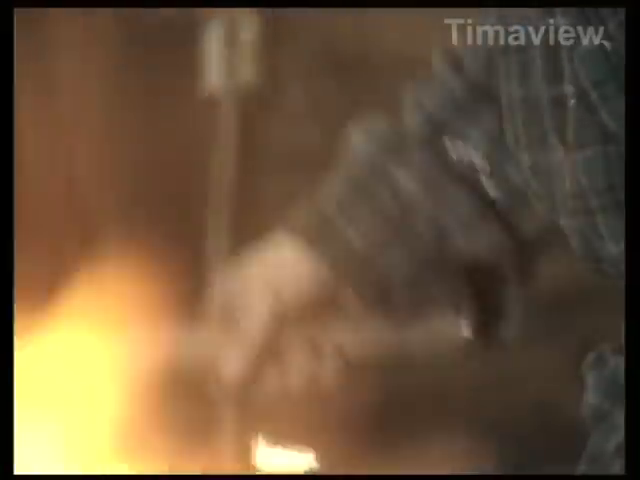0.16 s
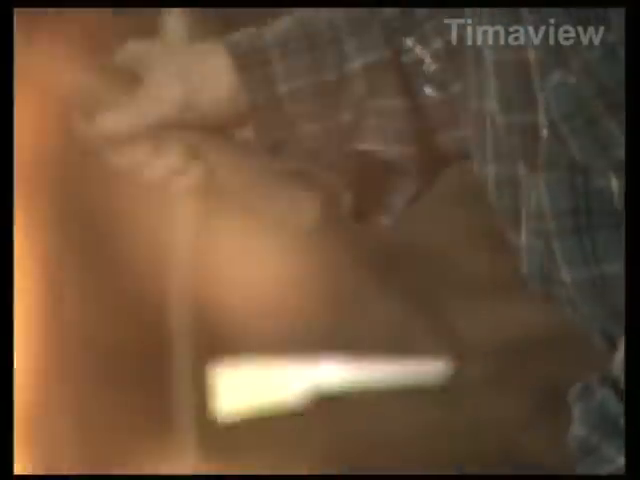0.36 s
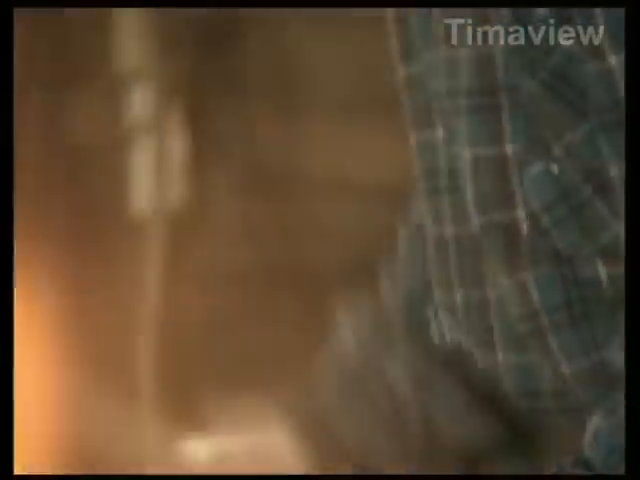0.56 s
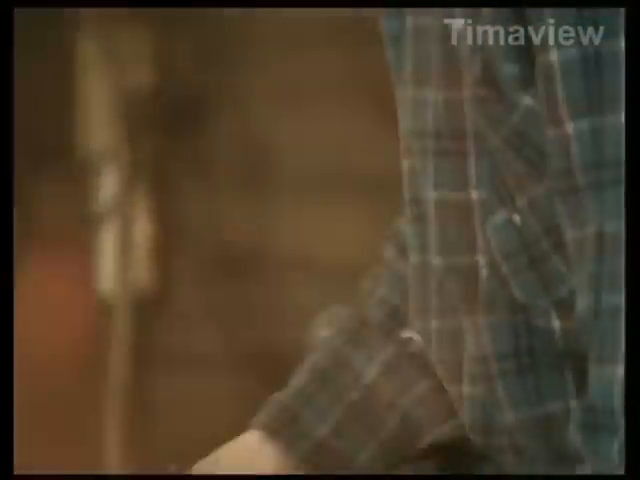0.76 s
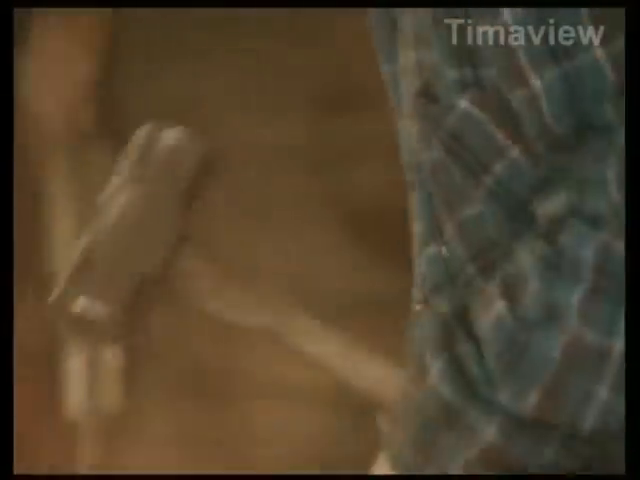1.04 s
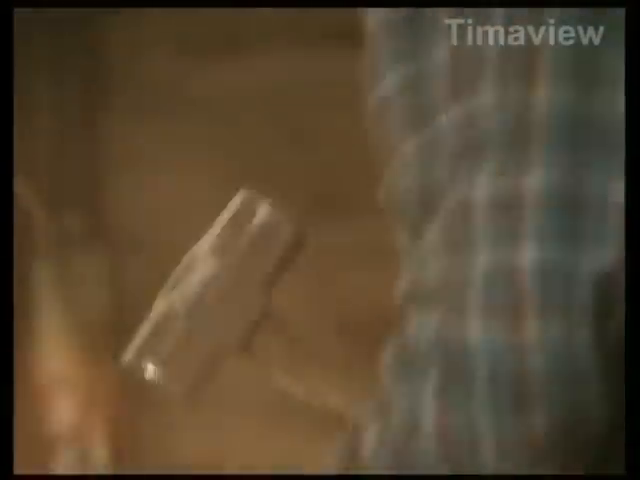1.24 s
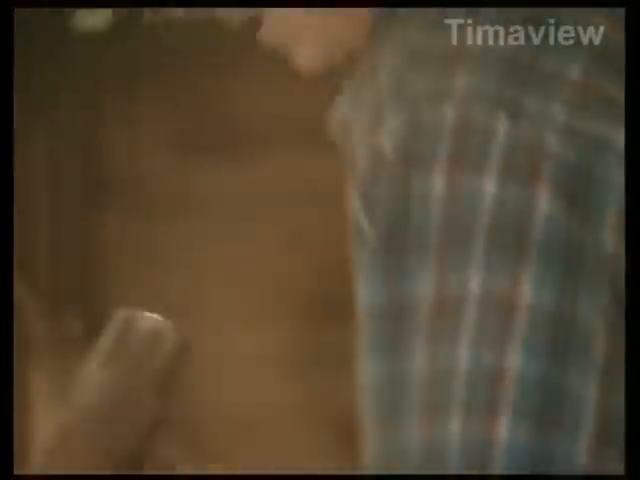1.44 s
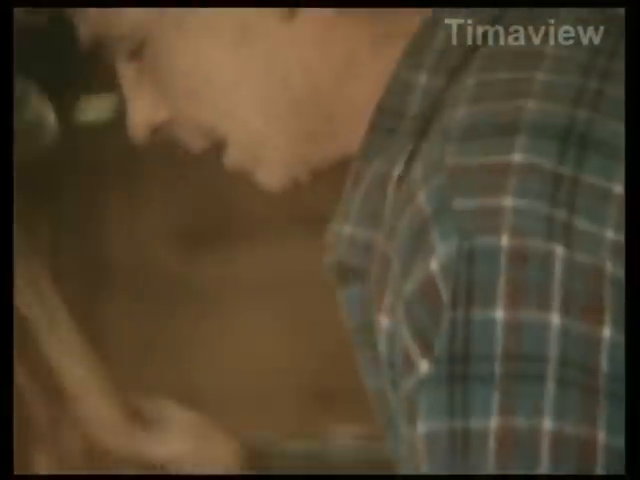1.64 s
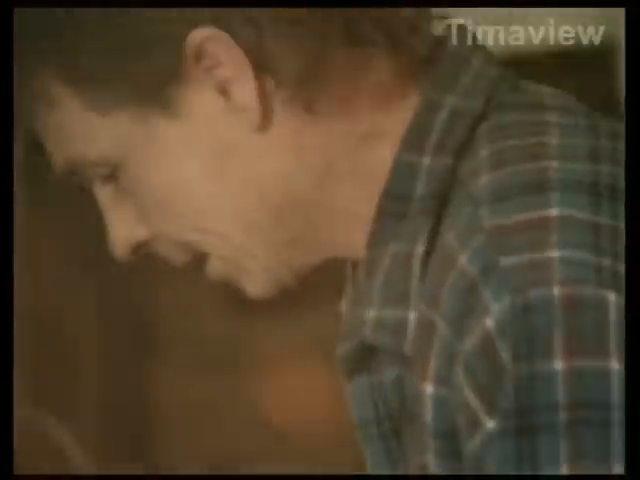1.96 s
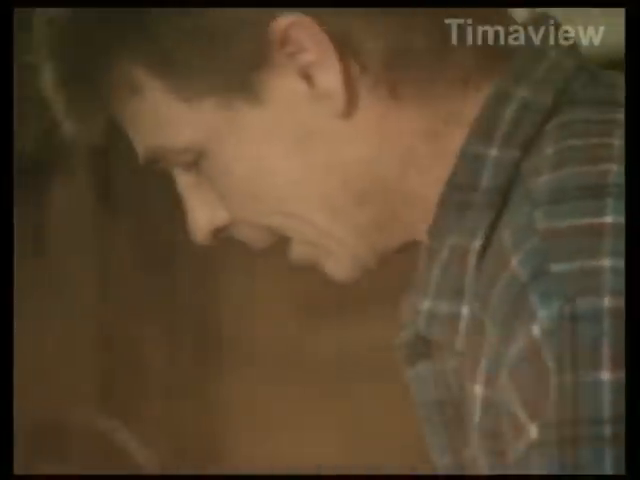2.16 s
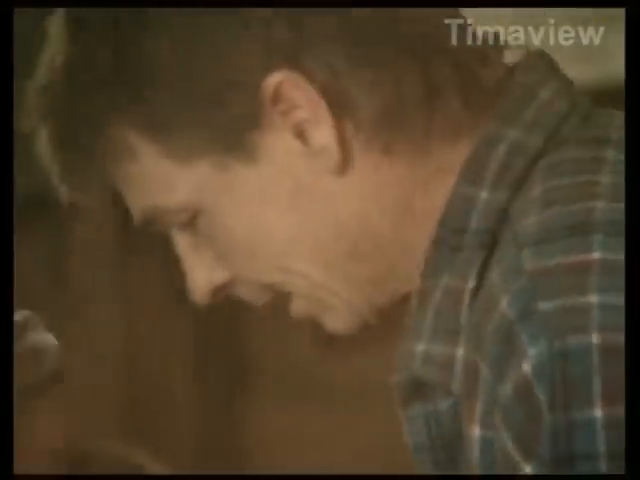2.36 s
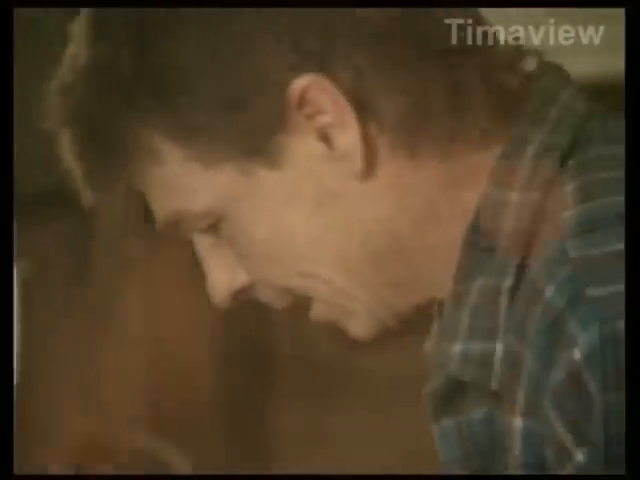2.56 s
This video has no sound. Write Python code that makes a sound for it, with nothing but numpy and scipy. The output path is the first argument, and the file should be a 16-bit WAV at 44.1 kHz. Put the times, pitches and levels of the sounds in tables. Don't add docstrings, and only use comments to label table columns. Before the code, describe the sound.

A hand hammer strikes an anvil in ringing blows, then clanks duller on hot iron in a workshop

```python
import sys
import numpy as np
from scipy import signal
from scipy.fft import rfft, irfft, next_fast_len
from scipy.io import wavfile
from scipy.ndimage import uniform_filter1d, minimum_filter1d, map_coordinates

SR = 44100
rng = np.random.default_rng(int(sys.argv[2]) if len(sys.argv) > 2 else 0)


def decibels_to_gain(level_db):
    exponent = np.asarray(level_db, float) / 20
    return 10 ** exponent


def pcm_store(signal):
    levels = np.round(np.clip(np.atleast_2d(signal), -1, 1) * 32767)
    wavfile.write(sys.argv[1], SR, levels.astype(np.int16).T)


N = 119070


def unit(x):
    return x / np.sqrt(np.mean(x ** 2) + 1e-20)


def along(points, hz):
    f, value = np.transpose(points)
    return np.interp(np.log(hz + 1), np.log(f + 1), value)


def wobble(rate):
    knots = rng.standard_normal(int(N * rate / SR) + 4)
    return map_coordinates(knots, [np.arange(N) * rate / SR])


def add(track, s, x):
    i = round(s * SR)
    x = x[max(-i, 0):N - i]
    track[max(i, 0):][:len(x)] += x


# (frequency [Hz], time to fade by 60 dB [s])
ROOM_DECAY = [(200, 0.43), (1000, 0.59), (3000, 0.63), (6000, 0.52), (12000, 0.39)]


def room(colour_db):
    hz, t, z = signal.stft(rng.standard_normal(SR), SR, nperseg=256)
    hz = hz[:, None]
    z = z * decibels_to_gain(colour_db(hz) - 60 * t / along(ROOM_DECAY, hz))
    tail = signal.istft(z, SR, nperseg=256)[1][:SR]
    return tail / np.std(tail[:SR // 10])


def plain_room():
    return room(lambda hz: 0 * hz)


def resonate(x, peaks):
    m = next_fast_len(len(x) + SR // 2)
    f = np.fft.rfftfreq(m, 1 / SR)
    gain = 0
    for k, (centre, width, db) in enumerate(peaks):
        damping = 1j * f * width
        gain = gain + (-1) ** k * decibels_to_gain(db) * damping / (centre * centre - f * f + damping)
    y = irfft(rfft(x, m) * gain, m)[:len(x)]
    return y / np.std(y[:SR // 10])


RISE_S = 0.0012

# (frequency [Hz], level [dB per Hz])
CRASH_COLOUR = [(59, -56), (100, -7), (1470, -9.5), (2000, -10), (4460, -3.5), (10800, -10.5),
                (12900, -20.5), (13500, -80)]


def crash(tilt_db, low_hz):
    crack_db, crack_s = -9, 0.025
    thud_db, thud_s, thud_hz = -17.5, 0.096, 34
    minor_db, minor_width_hz = -7, 29.6
    t = np.arange(SR) / SR

    def colour_db(hz):
        low_cut_db = -30 * np.log10(1 + (low_hz / (hz + 1)) ** 2)
        return along(CRASH_COLOUR, hz) + tilt_db * np.log2(hz / 3000 + 0.02) + low_cut_db

    draws = rng.uniform(0, 1, size=(100, 2))
    minor = [(1000 + 11500 * u, minor_width_hz, 3.6 * v) for u, v in draws]
    crack = 1 + decibels_to_gain(crack_db - 60 * t / crack_s)
    plain = room(colour_db) * crack * (1 - np.exp(-t / RISE_S))
    thud = decibels_to_gain(thud_db - 60 * t / thud_s) * np.sin(2 * np.pi * thud_hz * t)
    thud = thud * (250 / low_hz) ** 2
    return plain + decibels_to_gain(minor_db) * resonate(plain, minor) + thud


# (time [s], level [dB], steel ring over the crash [dB],
# brightness [dB per octave], low edge [Hz])
ANVIL_BLOWS = [
    (-.3, -14.5, -4.5, -2, 250),
    (0.2339, -8.5, -2, -2.5, 254),
    (.762, -6.5, -4, -1.06, 260),
]
BODY_HZ = [1410, 1517, 1625, 2446, 3212, 3274, 3587, 3895, 4150, 4293, 4498, 5593, 6573, 7946]
HORN_HZ = [990, 1140, 5176, 5900, 6237, 7558, 8580, 10400]
# (time to fade by 60 dB [s], beat [Hz], partner's share)
BODY_DECAY = [(0.75, 1.8, 0.49), (0.47, 4.37, 0.9), (0.58, 2.1, 0.13), (0.53, 2.9, 0.44), (0.71, 4.5, 0.3),
              (0.95, 2.26, 0.23), (0.47, 1.7, 0.92), (0.17, 4, 1), (0.45, 5.5, 0.85), (0.25, 5, 0.43),
              (0.52, 3.06, 0.51), (0.51, 1.1, 0.12), (0.56, 3.7, 0.34), (0.43, 4.6, 0.18)]
HORN_DECAY = [(0.23, 26.5, 0.97), (.3, 31, 0.7), (0.63, 2.5, .3), (.12, 52, 0.35), (0.58, 2.4, 0.94),
              (0.56, 3.5, 0.44), (0.49, 1.6, 0.73), (0.37, 4.7, .3)]
BODY_DB = [
    [-0.5, -17, 12, 7, -23, -7, -18, -17, -14, -16, -17, -11, -14, -18],
    [-40, 3.5, -9, -8.5, -40, -6, 2, -12, 1.5, -6, 5, -4.5, -11, -11],
    [-33, 3.5, -2.5, -33, -5.5, -3.5, -4, -10, 2, -22, -13, -1, -6, -1.5],
]
HORN_DB = [
    [-20, -20, 2, -20, -6.5, -15, -12, -11],
    [-5, -6, -19, 4.5, -9, -9, -10.5, -22],
    [-11.5, -21, -19, -4, -13, -11, -17, -17],
]


def anvil_blows():
    ring_room_db = -19
    out, t = np.zeros(N), np.arange(SR) / SR
    notes_hz, decays = BODY_HZ + HORN_HZ, BODY_DECAY + HORN_DECAY
    places = np.hstack([BODY_DB, HORN_DB])
    for (s, db, ring_db, tilt_db, low_hz), levels in zip(ANVIL_BLOWS, places):
        phases = rng.uniform(0, 2 * np.pi, len(levels))
        ring = np.zeros(SR)
        for hz, level, (t60, beat, share), phase in zip(notes_hz, levels, decays, phases):
            upper = np.sin(2 * np.pi * (hz + beat / 2) * t + phase)
            lower = np.sin(2 * np.pi * (hz - beat / 2) * t + phase)
            ring += decibels_to_gain(level - 60 * t / t60) * (upper - share * lower)
        tail = plain_room()
        echoes = signal.fftconvolve(ring, tail / np.linalg.norm(tail))[:SR]
        ring = ring + decibels_to_gain(ring_room_db) * echoes
        add(out, s, decibels_to_gain(db) * (crash(tilt_db, low_hz) + decibels_to_gain(ring_db) * ring))
    return out


# (frequency [Hz], level [dB per Hz])
ROAR_COLOUR = [(15, -34), (25, -35), (247, -6.5), (282, -5), (604, -8.5), (1400, -25.5), (1640, -26.5),
               (11500, -42.5), (13500, -57)]


def forge_roar():
    roar_db, flutter_db, slow_flutter_db, patchy_db = -37.5, 2.5, 2.2, -1.5
    hz, s, z = signal.stft(rng.standard_normal(N), SR, nperseg=2048)
    colour = decibels_to_gain(along(ROAR_COLOUR, hz))[:, None]
    fine = signal.istft(z * colour, SR, nperseg=2048)[1][:N]
    hz, s, z = signal.stft(fine, SR, nperseg=256)
    patches = uniform_filter1d(rng.standard_normal((hz.size, s.size)), 3, 0)
    patches = unit(uniform_filter1d(patches, 12, 1))
    roar = unit(signal.istft(z * decibels_to_gain(patchy_db * patches), SR, nperseg=256)[1][:N])
    return decibels_to_gain(roar_db + flutter_db * wobble(30.38) + slow_flutter_db * wobble(6.26)) * roar


# (frequency [Hz], level [dB])
HUM_TONES = [(50, -56), (100, -55), (200, -49)]


def mains_hum():
    t = np.arange(N) / SR
    return sum(decibels_to_gain(db) * np.sin(2 * np.pi * hz * t) for hz, db in HUM_TONES)


# (time [s], level [dB], brightness [dB per octave])
EMBER_SNAPS = [(.187, -46, 1), (.6994, -42, 1), (1.502, -45, 1), (1.5194, -40, 1), (2.648, -40, -9),
               (2.6678, -35, 3), (2.692, -43, 2)]


def embers():
    snap_s, trace_db = 0.0064, -22
    out, t = np.zeros(N), np.arange(SR) / SR
    for s, db, tilt_db in EMBER_SNAPS:
        snap = room(lambda hz: tilt_db * np.log2(hz / 3000 + 0.39))
        add(out, s, decibels_to_gain(db) * snap * (decibels_to_gain(-60 * t / snap_s) + decibels_to_gain(trace_db)))
    return out


def damped_ring(body, free_db):
    sharpen, free_s = 0.51, 0.44
    t = np.arange(SR) / SR
    peaks = [(hz, sharpen * width, level) for hz, width, level in body]
    ring = resonate(plain_room(), peaks)
    free = sum(decibels_to_gain(level) * np.sin(2 * np.pi * hz * t) for hz, width, level in body if width < 60)
    return ring + decibels_to_gain(free_db - 60 * t / free_s) * unit(free) * (1 - np.exp(-t / RISE_S))


# (time [s], level [dB], ring over the crash [dB], brightness [dB per octave], low edge [Hz])
TAPS = [
    (1.136, -42.5, 1, -12.5, 1800),
    (1.253, -43, 2.5, 0, 2000),
    (1.363, -35.5, 1, -3.5, 1500),
    (.739, -69, 9, 6, 3000),
]
# (frequency [Hz], width [Hz], level [dB])
CLINK_1 = [(1610, 60, -4), (2860, 55, -1), (2550, 80, -6)]
CLINK_2 = [(3270, 83, -1), (3620, 28, -2), (4290, 58, -2), (4600, 34, -5), (5660, 38, 0), (6000, 40, -1),
           (8050, 41, -3), (8490, 38, -10)]
CLINK_3 = [(3510, 43, 0), (3900, 29, -4), (4300, 29, -5), (4930, 31, -6), (5680, 30, -6), (5990, 66, -2),
           (6900, 50, -7), (7950, 30, 0), (8970, 52, -14), (9580, 39, -17)]
CLINK_4 = [(4150, 55, -3), (4400, 400, 0), (4560, 55, -2)]


def light_taps():
    rattle_db_per_s, rattle_s = 27, 0.23
    out, t = np.zeros(N), np.arange(SR) / SR
    rattle_db = rattle_db_per_s * np.minimum(t, rattle_s)
    bodies = [CLINK_1, CLINK_2, CLINK_3, CLINK_4]
    for (s, db, ring_db, tilt_db, low_hz), body in zip(TAPS, bodies):
        ring = damped_ring(body, free_db=-11)
        add(out, s, decibels_to_gain(db + rattle_db) * (crash(tilt_db, low_hz) + decibels_to_gain(ring_db) * ring))
    return out


def blower_whistle():
    start_s, end_s, fade_s = 1.04, 1.43, 0.04
    whistle_hz, whistle_db = 678, -41
    t = np.arange(N) / SR
    on = np.clip(np.minimum(t - start_s, end_s - t) / fade_s, 0, 1)
    loudness = decibels_to_gain(whistle_db + 1.5 * wobble(15))
    return on * loudness * np.sin(2 * np.pi * whistle_hz * t + 0.6 * wobble(20))


# (time [s], level [dB], ring over the crash [dB],
# brightness [dB per octave], low edge [Hz])
WORK_BLOWS = [
    (1.565, -6, -1.5, -0.55, 590),
    (1.848, -7, -4, 0.63, 860),
    (2.1358, -5, -4, 0.73, 218),
    (2.2604, -14.5, 0.5, -1.2, 910),
]
# (frequency [Hz], width [Hz], level [dB])
CLANK_1 = [(1550, 26, -6), (2330, 32, -5), (2560, 34, -5), (2970, 53, -2), (3360, 31, -5), (3600, 50, -3),
           (3890, 55, 0), (4940, 98, -4), (5700, 55, -5), (6000, 100, -4), (6380, 60, -7), (7280, 48, -8),
           (7930, 51, -7), (9910, 180, -13)]
CLANK_2 = [(1580, 32, -9), (3100, 38, -5), (3570, 100, -5), (4030, 36, -4), (4640, 41, 0), (5350, 33, -4),
           (5710, 65, -5), (5970, 40, -6), (6400, 34, -3), (6570, 24, -4), (7280, 33, -7), (7920, 43, -6),
           (8740, 43, -11), (9390, 45, -12)]
CLANK_3 = [(2140, 59, -6), (3090, 26, -3), (3600, 60, -6), (4520, 93, -2), (4720, 39, -3), (5120, 110, -3),
           (5680, 48, 0), (6000, 28, -5), (6550, 31, -3), (7480, 76, -5), (8520, 41, -7), (9630, 65, -8)]
CLANK_4 = [(1550, 91, -12), (2640, 40, -1), (3000, 45, 0), (3340, 33, -1), (3590, 60, -2), (3840, 54, -5),
           (4520, 60, -3), (5050, 150, -2), (5410, 77, -3), (6280, 37, 0), (7310, 40, -2), (7950, 32, -2),
           (8720, 33, -9), (9910, 34, -12)]


def work_clanks():
    out = np.zeros(N)
    bodies = [CLANK_1, CLANK_2, CLANK_3, CLANK_4]
    for (s, db, ring_db, tilt_db, low_hz), body in zip(WORK_BLOWS, bodies):
        ring = damped_ring(body, free_db=-3.5)
        add(out, s, decibels_to_gain(db) * (crash(tilt_db, low_hz) + decibels_to_gain(ring_db) * ring))
    return out


def limiter_gain(x):
    ceiling_db, release_s = -8, 0.012
    width = int(release_s * SR)
    slow = signal.lfilter([1 / width], [1, 1 / width - 1], x ** 2)
    fast = np.abs(uniform_filter1d(x ** 2, 90))
    power = np.maximum(slow, 0.66 * fast)
    return (1 + (power / decibels_to_gain(2 * ceiling_db)) ** 1.814) ** (-1 / 3)


def scene():
    duck = 0.028
    hits = anvil_blows() + light_taps() + work_clanks()
    background = forge_roar() + mains_hum() + embers() + blower_whistle()
    gain = uniform_filter1d(limiter_gain(hits), 130)
    return (gain * hits + gain ** duck * background)[None]


def drop_weak_treble(x):
    hole_db, hole_tilt_db, hole_hz = -2, 4.5, 4500
    hz, t, z = signal.stft(x, SR, nperseg=1024, noverlap=768)
    hz = hz[:, None]
    power = uniform_filter1d(uniform_filter1d(np.abs(z) ** 2, 4, 0), 9, 1)
    power = np.abs(power) + 1e-20
    loud_db = np.clip(10 * np.log10(power.sum(0)) + 28, 0, 20) / 4
    bar_db = hole_db + hole_tilt_db * np.log2(hz / 8000 + 1e-3) - loud_db
    bar = np.exp(uniform_filter1d(np.log(power), 31, 0)) * decibels_to_gain(2 * bar_db)
    keep = np.where(hz > hole_hz, 1 / (1 + (bar / power) ** 10), 1)
    return signal.istft(z * keep, SR, nperseg=1024, noverlap=768)[1][:N]


# (above [Hz], jump ahead [dB], only when under [dB])
HUSH = [
    (1300, 25, -45),
    (7000, 11, -35),
]


def hush_before_blows(x):
    span = int(0.013 * SR)
    for edge_hz, jump_db, under_db in HUSH:
        high_pass = signal.butter(6, edge_hz, "high", fs=SR, output="sos")
        treble = signal.sosfiltfilt(high_pass, x)
        level = np.sqrt(np.abs(uniform_filter1d(treble ** 2, 300)))
        ahead = np.roll(-minimum_filter1d(-level, span), -span // 2)
        hushed = 1.0 * (ahead > decibels_to_gain(jump_db) * level) * (level < decibels_to_gain(under_db))
        x = x - treble * uniform_filter1d(hushed, 44)
    return x


def top_cut(x):
    return signal.sosfilt(signal.butter(12, 13670, fs=SR, output="sos"), x)


def record(dry):
    clip_top, top_hz, peak_top = 0.99, 12750, 0.94
    x = dry / (1 + np.abs(dry / clip_top) ** 4) ** 0.25
    m = next_fast_len(N + 8192)
    hz = np.fft.rfftfreq(m, 1 / SR)
    top_cut_db = -60 / (1 + np.exp((top_hz - hz) / 40))
    x = irfft(rfft(x, m) * decibels_to_gain(top_cut_db), m)[..., :N]
    x = hush_before_blows(drop_weak_treble(x[0]))[None]
    mix = x / (1 + np.abs(x / peak_top) ** 12) ** (1 / 12)
    return top_cut(mix)


dry = scene()
out = record(dry)
pcm_store(out)
```